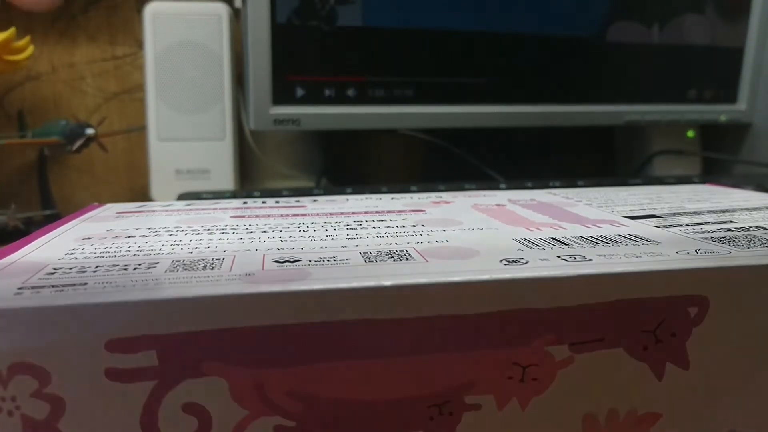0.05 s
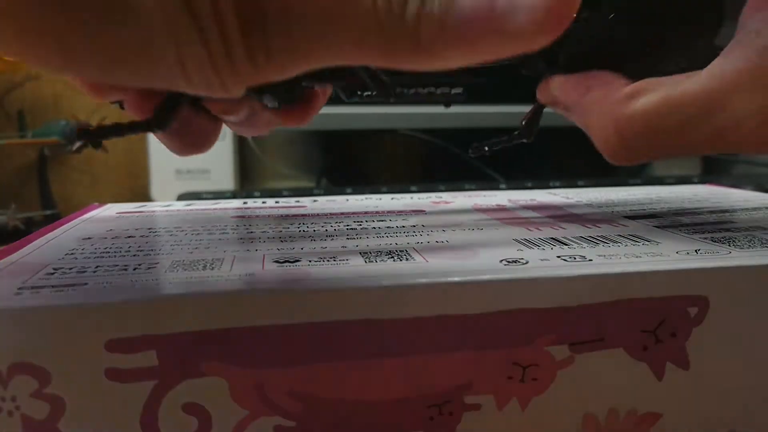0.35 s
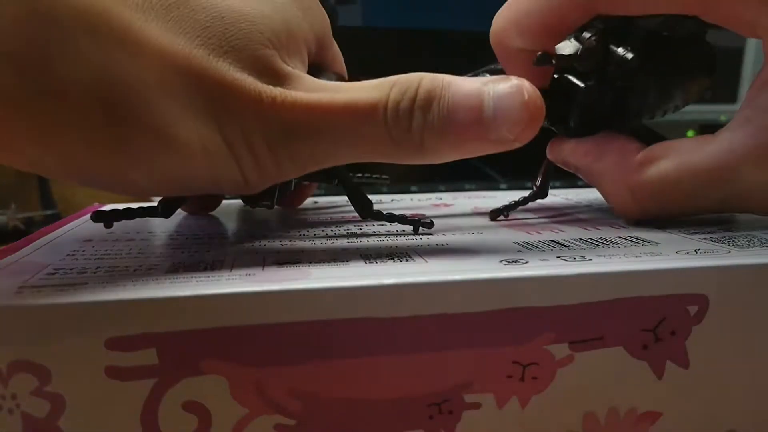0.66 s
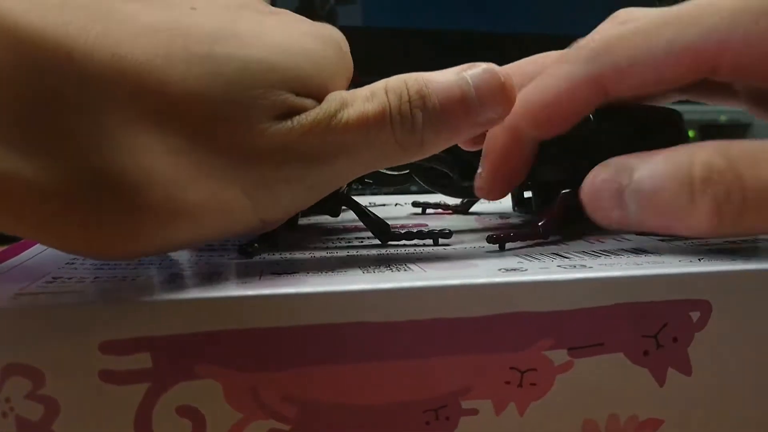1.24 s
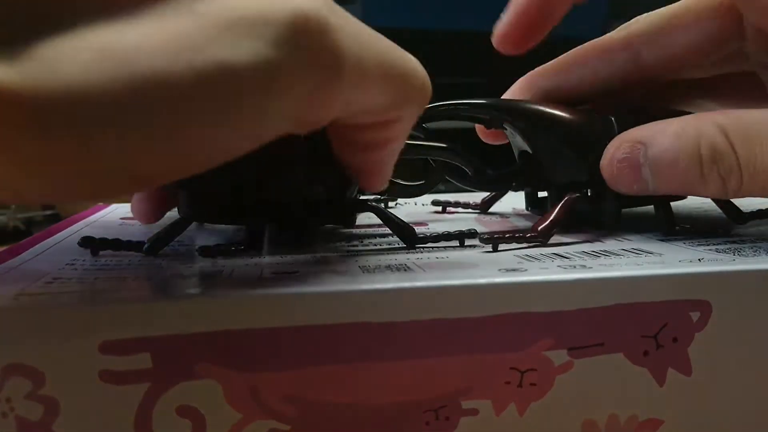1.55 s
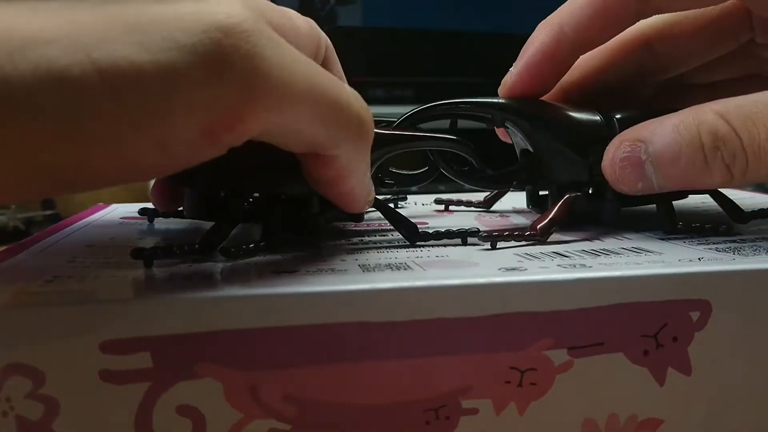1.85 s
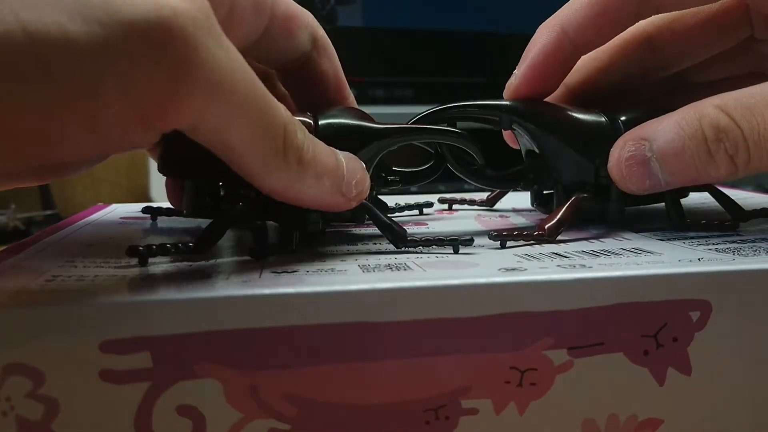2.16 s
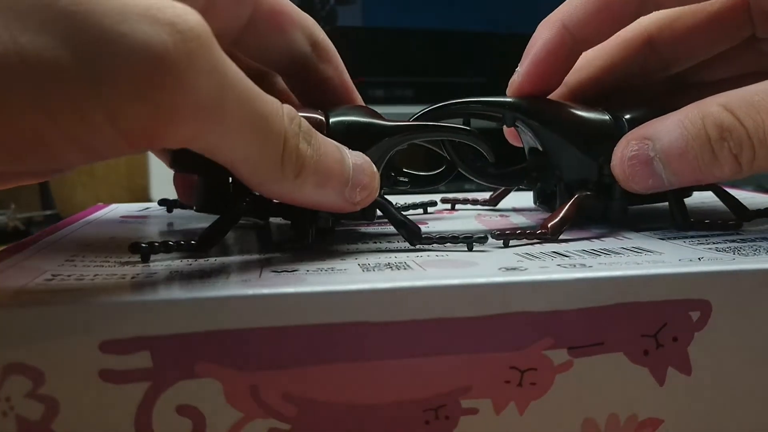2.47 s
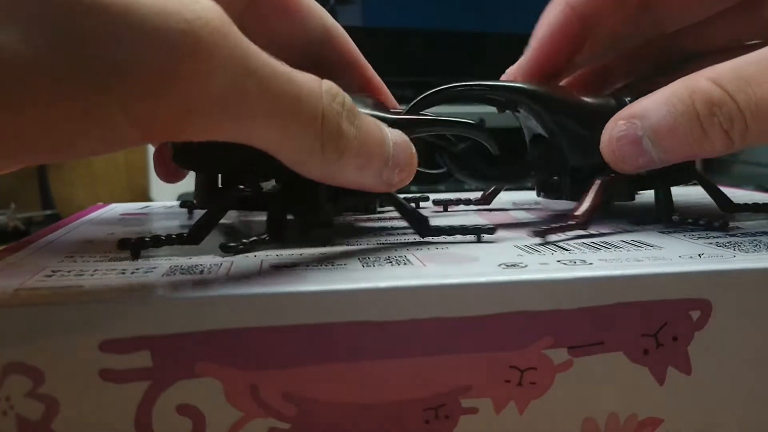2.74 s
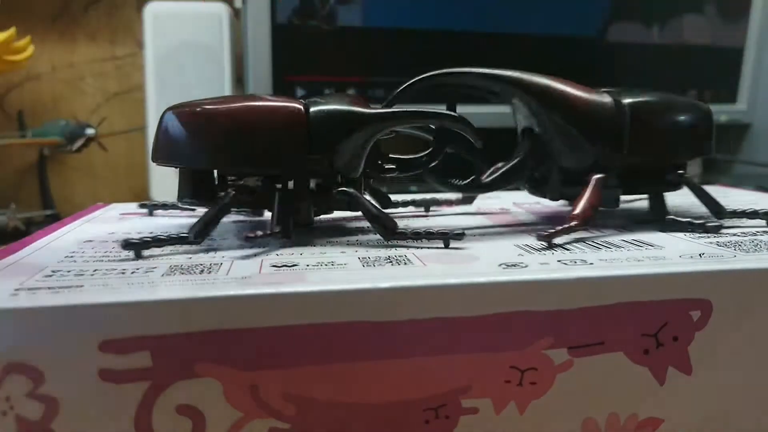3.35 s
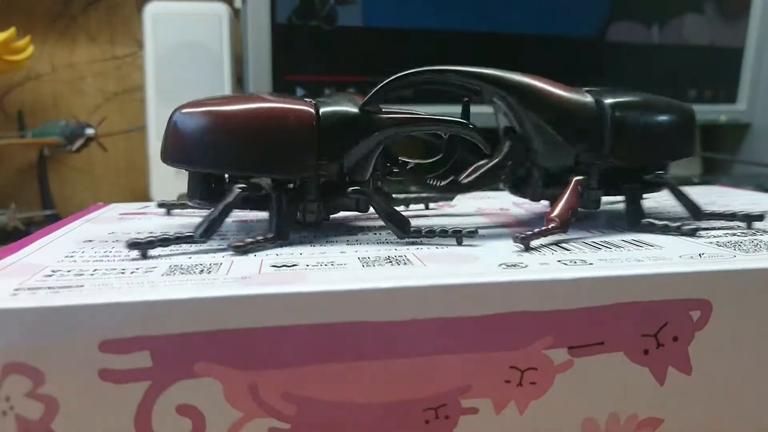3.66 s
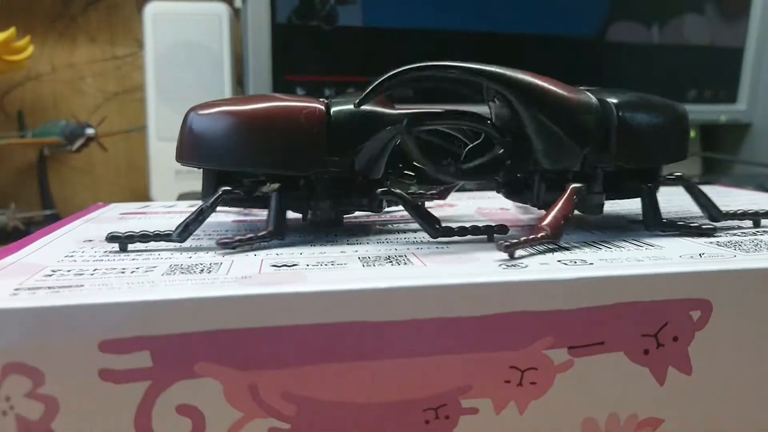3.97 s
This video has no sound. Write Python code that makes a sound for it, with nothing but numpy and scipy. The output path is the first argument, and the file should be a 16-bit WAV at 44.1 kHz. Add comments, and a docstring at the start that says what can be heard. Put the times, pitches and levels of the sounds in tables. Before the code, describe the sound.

Two plastic wind-up toy beetles rasp and whirr, close by in a small room. For the first 1.3 seconds their legs tick and scrape on a cardboard box. Four short rasping winding strokes with sharp clicks follow until about 2.5 seconds. From 2.6 seconds the motors run in a louder, rattling whirr with faint rising whines until 4 seconds. A low thump hits the left microphone at 2.7 seconds.

```python
"""In a small room, two plastic toy beetles with spring motors are set down on a cardboard box, close
to the microphones. Their legs tick and scrape. Rolling them winds the springs in short rasping
strokes: gear teeth click into the hard shells and hum in the box. Then both motors run loose together,
horns locked, with faint rising whines, and one thump hits the left microphone."""
import sys
import numpy as np
from scipy import signal
from scipy.fft import rfft, irfft
from scipy.io import wavfile

SR = 44100
rng = np.random.default_rng(int(sys.argv[2]) if len(sys.argv) > 2 else 0)


def store_pcm(level_fs):
    """Save levels as 16-bit WAV."""
    pcm = np.round(np.clip(level_fs, -1, 1) * 32767).astype(np.int16)
    wavfile.write(sys.argv[1], SR, np.atleast_2d(pcm).T)


N = 176400
T = np.arange(N) / SR


def undb(db):
    """Turn decibels into a number to multiply by."""
    return 10 ** (np.asarray(db) / 20)


def unit(x):
    """Scale a signal to an average strength (rms) of 1."""
    return x / np.sqrt(np.mean(x ** 2) + 1e-20)


def curve(rows, column=1):
    """One column of a table, joined by straight lines in time."""
    rows = np.array(rows)
    return np.interp(T, rows[:, 0], rows[:, column])


def walk(steps_per_s):
    """Random wandering around zero, with a spread near 1."""
    return 1.2 * np.interp(T * steps_per_s, np.arange(4096), rng.standard_normal(4096))


def pan(db):
    """Left and right gains; a positive number makes the left louder."""
    return undb(np.array([[db], [-db]]) / 2)


def convolve(x, response):
    """Let every sample of x set off the response, as a tap sets off a ring."""
    return signal.fftconvolve(np.atleast_2d(x), np.atleast_2d(response), axes=1)[:, :N]


def body(colour, rings=(), size=4096):
    """How an object sounds after one tap: a broad tone colour plus narrow ringing peaks."""
    hz, db = np.array(colour, float).T
    freqs = np.maximum(np.arange(size // 2 + 1) * SR / size, 1)
    colour_db = np.interp(np.log(freqs), np.log(hz), db)
    lift_db = sum(height / (1 + (2 * (freqs - centre) / width) ** 2) for centre, width, height in rings)
    cepstrum = irfft(np.log(undb(colour_db + lift_db)))
    # Folding the second half onto the first puts all the ringing after the tap.
    cepstrum[1:size // 2] *= 2
    cepstrum[size // 2 + 1:] = 0
    response = irfft(np.exp(rfft(cepstrum)))
    return response / np.linalg.norm(response)


def space(chatter_db, room_db, size=12000):
    """Paths to both microphones: direct, quick bounces off shell and box (chatter), and room echo."""
    t = T[:size]
    paths = np.zeros((2, size))
    paths[:, 0] = 1
    for db, fade_s, start_s in ((chatter_db, .011, .0004), (room_db, .11, .004)):
        shared, apart = rng.standard_normal((2, size))
        apart = signal.lfilter(*signal.butter(1, 3000, "high", fs=SR), apart)  # the lows stay shared
        fade = np.exp(-np.log(1000) * t / fade_s) * (t > start_s)
        echoes = np.array([shared + apart, shared - apart]) * fade
        paths += undb(db) * unit(echoes) / np.sqrt(size)
    paths[1] = np.roll(paths[1], int(.00017 * SR))  # the right side hears it slightly later
    return unit(paths) / np.sqrt(size)


def hits(rows, response, chatter_db, room_db):
    """Single blows on one object, each with its own echoes."""
    track = np.zeros((2, 2 * N))
    for time, db, pan_db in rows:
        blow = convolve(space(chatter_db, room_db), response)
        peak = np.abs(blow).max(axis=1).mean()
        start = int(time * SR)
        track[:, start:start + blow.shape[1]] += blow / peak * undb(db) * pan(pan_db)
    return track[:, :N]


def friction(levels, colour, rough_db, apart):
    """Uneven catching and slipping, partly different at the two microphones."""
    noise = rng.standard_normal(N) + apart * rng.standard_normal((2, N))
    grains = noise * undb(rough_db * walk(220))
    return unit(convolve(grains, body(colour))) * undb(curve(levels))


def background():
    """A very faint, steady low drone and hiss."""
    # tone colour of the noise (frequency [Hz], level [dB])
    colour = [(120, -27.5), (200, 3), (259, -17), (347, -8.5), (491, -22), (529, -16), (683, -30.5),
              (1060, -23.5), (13300, -27), (16000, -58)]
    return undb(-68) * unit(convolve(rng.standard_normal((2, N)), body(colour)))


def handling():
    """Feet drag over the card and the box rubs hollowly under the hands, above a low rumble."""
    # how loud each noise is (time [s], level [dB])
    drag = [(0, -70), (.75, -74.5), (.92, -66.5), (1.0, -54.5), (1.05, -62.5), (1.08, -42.5), (1.11, -72),
            (1.16, -59), (1.195, -51), (1.222, -29), (1.25, -65), (1.29, -57), (1.55, -47.5), (1.65, -60),
            (1.87, -69), (1.94, -64.5), (2.19, -51), (2.26, -81), (2.35, -52), (2.42, -80), (2.5, -67),
            (2.6, -76)]
    rub = [(0, -75), (.6, -74), (.9, -66), (1.05, -61), (1.3, -53.5), (1.5, -48), (1.62, -51),
           (1.76, -46.5), (1.87, -61.5), (2.1, -50.5), (2.22, -62.5), (2.33, -61), (2.45, -61.5),
           (2.6, -61), (4, -62.5)]
    rumble = [(0, -67.5), (.3, -62), (.62, -66), (.67, -47), (.76, -57.5), (.85, -59.5), (1.0, -55.5),
              (1.3, -53), (1.4, -64), (1.55, -59), (2.5, -63.5), (2.8, -59), (3.7, -59.5), (3.83, -47),
              (3.95, -60)]
    # tone colour of each noise (frequency [Hz], level [dB])
    drag_colour = [(530, -36), (900, -14), (1320, -2.5), (1460, -35), (1950, -7.5), (2730, -14.5),
                   (4360, -3.5), (5480, 3.5), (16000, -24.5)]
    rub_colour = [(60, -9.5), (160, -8), (340, -1), (450, -2.5), (650, -4), (1000, -14.5), (2000, -26.5),
                  (4000, -12), (16000, -67)]
    rumble_colour = [(20, -48), (45, -4), (68, -3), (100, -2.5), (170, -9), (300, -22), (800, -40),
                     (16000, -64)]
    return (friction(drag, drag_colour, rough_db=3.5, apart=.8)
            + friction(rub, rub_colour, rough_db=4.5, apart=.6)
            + friction(rumble, rumble_colour, rough_db=1, apart=.54))


def taps():
    """Loose legs and horns tick, shell clacks on shell, a hard leg snaps and feet knock on the box."""
    # the blows (time [s], relative peak [dB], left minus right [dB])
    ticks = [(.0865, -38.5, -4), (.128, -20.5, 3), (.145, -28.5, 1), (.154, -40, -9), (.187, -32, -2),
             (.193, -40, -4), (.201, -29.5, 2), (.207, -38, -7), (.4005, -39, -8), (.404, -30, -2),
             (.411, -29, 3), (.440, -45, -5), (.574, -32, -3), (.582, -32.5, -2), (.609, -38.5, 2),
             (.615, -37, -5), (.638, -39, -3), (.986, -37.5, -1), (1.074, -33, 0), (1.171, -32, 2),
             (1.225, -23.5, -7), (1.233, -28, 9), (1.274, -46, -1)]
    clacks = [(.1263, -17, 6)]
    snaps = [(.528, -41.5, 1), (.799, -52.5, 0), (1.8905, -22, -1)]
    knocks = [(.658, -55, 3), (1.074, -39.5, -2), (1.214, -26.5, -2), (1.219, -40, -9), (1.526, -29, -3),
              (1.722, -35, -4), (3.539, -39, 13)]
    # tone colour of each struck part (frequency [Hz], level [dB])
    tick_colour = [(500, -46), (1000, -41), (1700, -35), (2400, -20.5), (3200, -15.5), (3950, -4),
                   (4700, -7.5), (5400, -1.5), (6400, 2), (7200, -0.5), (8300, -18), (9800, -14),
                   (11500, -24.5), (16000, -22)]
    clack_colour = [(500, -33), (2400, -28), (3900, -3.5), (4800, -17), (6400, 9.5), (8300, -4),
                    (9800, 2.5), (11500, -16), (16000, -18)]
    leg_colour = [(500, -38), (2900, -20), (3600, -13), (4150, 0), (4500, -2), (4950, -1), (5600, -11),
                  (7400, -13), (9000, -24), (16000, -36)]
    box_colour = [(100, -13), (300, -2.5), (420, -7), (620, 6.5), (900, -7.5), (1400, -8.5), (1900, -3.5),
                  (2600, -15), (4000, -20.5), (8000, -13), (16000, -32)]
    return (undb(3.5) * hits(ticks, body(tick_colour), chatter_db=11.5, room_db=6)
            + hits(clacks, body(clack_colour), chatter_db=10, room_db=-2)
            + undb(5.5) * hits(snaps, body(leg_colour), chatter_db=1.5, room_db=-13)
            + undb(7.5) * hits(knocks, body(box_colour), chatter_db=5.5, room_db=-.5))


def gears(rows, speed, jitter, wobble, uneven_db, grit_db, grit_fade_teeth, chatter_db,
          shift_db=0, contacts=4):
    """One click for each gear tooth, at one of a few contact points, with grinding between clicks."""
    teeth_per_s = curve(rows) * speed * (1 + wobble * walk(25))
    turning = (T >= rows[0][0]) & (T <= rows[-1][0])
    teeth_passed = np.cumsum(turning * teeth_per_s * (1 + jitter * walk(400))) / SR
    gain = turning * undb(curve(rows, column=2) + .7 * walk(30))
    click_at = np.flatnonzero(np.diff(np.ceil(teeth_passed), prepend=0))
    strength = unit(undb(uneven_db * rng.standard_normal(2048)[:len(click_at)]))
    strength *= np.sqrt(SR / teeth_per_s[click_at]) * gain[click_at]  # speed alone adds no loudness
    contact = rng.integers(0, contacts, 2048)[:len(click_at)]
    clatter = 0
    for point in range(contacts):
        load = undb(shift_db * walk(12))  # the load can shift between contacts
        clicks = np.zeros(N)
        clicks[click_at] = strength * (contact == point) * load[click_at]
        clatter = clatter + convolve(clicks, space(chatter_db, room_db=-14))
    grit_fade = np.exp(-(teeth_passed % 1) / grit_fade_teeth) * np.sqrt(2 / grit_fade_teeth)
    grind = grit_fade * gain * rng.standard_normal((2, N))
    return (clatter + undb(grit_db) * grind) / np.sqrt(1 + undb(grit_db) ** 2)


def winding():
    """Each push speeds the gears up and lets them slow again; their clicks ring in the shell."""
    # four pushes, each a list of (time [s], tooth rate [1/s], relative level [dB])
    strokes = [
        [(1.304, 117, -51), (1.33, 197, -30.5), (1.40, 254, -24.5), (1.45, 296, -24), (1.505, 363, -21.5),
         (1.53, 240, -25.5), (1.555, 120, -41)],
        [(1.676, 170, -37), (1.70, 316, -24.5), (1.722, 327, -20), (1.75, 165, -33), (1.77, 118, -35.5),
         (1.802, 165, -30), (1.815, 150, -44)],
        [(1.974, 100, -34.5), (2.015, 160, -34), (2.05, 270, -24), (2.08, 335, -25.5), (2.118, 354, -18.5),
         (2.15, 295, -26.5), (2.175, 73, -52)],
        [(2.277, 103, -42), (2.32, 152, -40.5), (2.36, 79, -44.5)],
    ]
    # single teeth slipping in a held toy (time [s], relative peak [dB], left minus right [dB])
    slips = [(1.256, -23.5, -1), (1.305, -11.5, -1), (1.575, -25.5, 0), (1.777, -23, -3), (1.826, -27, 8),
             (2.043, -9.5, 2), (2.215, -24.5, 4), (2.229, -23.5, 2), (2.312, -9.5, 1.5), (2.392, -30.5, 3),
             (2.437, -18, 1), (2.4445, -29, 5), (2.454, -22, 4), (2.470, -32, 3), (2.493, -21.5, -4),
             (2.500, -22.5, 12), (2.511, -33, 11), (2.5365, -20, 1), (2.5635, -26, 5)]
    # tone colour of the shell (frequency [Hz], level [dB])
    shell_colour = [(120, -42), (200, -60), (347, -17.5), (409, -40), (709, -22), (806, -29), (1080, -25),
                    (1500, -34), (1980, -29.5), (2330, -28), (4430, -6), (5330, -9), (6280, 3), (8120, -16),
                    (9750, -12.5), (12200, -25), (16000, -18.5)]
    teeth = 0
    for stroke, pan_db in zip(strokes, [1.5, 2.5, 3.5, 2.5]):
        teeth += pan(pan_db) * gears(stroke, speed=1, jitter=.06, wobble=.0077, uneven_db=2.5,
                                     grit_db=-8, grit_fade_teeth=1, chatter_db=2.5, contacts=6)
    shell = body(shell_colour)
    return (undb(3.5) * convolve(teeth, shell)
            + undb(.5) * hits(slips, shell, chatter_db=-4.5, room_db=-6)
            + undb(-36) * sum(box_hum(stroke) for stroke in strokes))


def box_hum(rows):
    """The box hums roughly at the rate of the gear teeth, and at two and three times that rate."""
    # tones in the hum (multiple of the tooth rate, relative level [dB])
    harmonics = [(1, -14), (2, -9.5), (3, -12)]
    unsteady = 1 + .03 * walk(30) + .05 * walk(300)
    phase = 2 * np.pi * np.cumsum(curve(rows) * unsteady) / SR
    tone = sum(undb(db + 1.8 * walk(10)) * np.sin(round(k) * phase) for k, db in harmonics)
    turning = (T > rows[0][0]) & (T <= rows[-1][0])
    return tone * undb(curve(rows, column=2)) * turning


def running():
    """Both motors whirr near the middle; the second, slightly faster one takes over for a while."""
    # the free run (time [s], base tooth rate [1/s], relative level [dB])
    run = [(2.577, 104, -35), (2.605, 199, -30.5), (2.63, 322, -20), (2.68, 373, -15), (2.80, 383, -16),
           (2.85, 372, -15.5), (2.93, 400, -16), (2.975, 343, -19.5), (3.01, 370, -16.5), (3.20, 363, -16),
           (3.31, 390, -18), (3.45, 350, -17.5), (3.54, 395, -16.5), (3.70, 368, -17.5), (3.76, 392, -15.5),
           (3.82, 333, -17.5), (3.90, 365, -17.5), (4.0, 390, -17)]
    # how much louder the first motor is than the second (time [s], lead [dB])
    first_lead = [(2.58, 18), (2.95, 15.5), (3.2, 0.5), (3.4, -7), (3.6, -7), (4.0, -0.5)]
    # tone colour of both shells (frequency [Hz], level [dB])
    shell_colour = [(100, -35.5), (250, -31), (400, -29), (750, -24), (1100, -26), (1500, -30.5),
                    (1950, -25), (2350, -26.5), (2900, -20.5), (3400, -13), (4200, -7.5), (4700, -8.5),
                    (5400, -9), (5800, -4.5), (6400, -2), (7100, -10), (8200, -16.5), (10000, -12.5),
                    (11000, -14.5), (13000, -19), (15700, -14.5)]
    # where each beetle's shell rings (frequency [Hz], width [Hz], lift [dB])
    first_rings = [(3880, 27, 1), (4514, 32, -4), (4610, 44, 10), (5540, 180, 7.5), (5930, 160, 7),
                   (6290, 100, 1.5), (6620, 130, 9.5), (6660, 31, 2.5), (7166, 260, 12), (7640, 106, 12.5),
                   (9920, 250, 4), (15000, 220, 2)]
    second_rings = [(4256, 90, 5.9), (4380, 81, 8.5), (4690, 32, 3.2), (5380, 26, 3), (5830, 46, 4.5),
                    (6400, 36, 3.5), (6330, 24, 4.7), (7400, 21, 1.7), (8480, 130, 5), (10600, 80, 2.5),
                    (12080, 210, 8), (13400, 120, 5)]
    first_teeth = gears(run, speed=.97, jitter=.06, wobble=.015, uneven_db=1,
                        grit_db=-3, grit_fade_teeth=.86, chatter_db=3, shift_db=1.5)
    second_teeth = gears(run, speed=1.04, jitter=.08, wobble=.025, uneven_db=2.5,
                         grit_db=-1, grit_fade_teeth=.62, chatter_db=3, shift_db=2)
    first = convolve(first_teeth, body(shell_colour, first_rings)) * pan(.8)
    second = convolve(second_teeth, body(shell_colour, second_rings)) * pan(.42)
    lead = undb(curve(first_lead))
    rasp = (lead * first + second) / np.sqrt(1 + lead ** 2)
    return undb(2.5) * rasp + undb(-32) * box_hum(run)


def thump(start_s=2.689, gain_db=-6.5, start_hz=210, rest_hz=52, sag_s=.0031, decay_s=.012):
    """A bump at the left microphone: a sharp edge, then a low swing that drops in pitch and dies."""
    t = np.maximum(T - start_s, 0)
    pitch = rest_hz + (start_hz - rest_hz) * np.exp(-t / sag_s)
    phase = 2 * np.pi * np.cumsum((t > 0) * pitch) / SR
    envelope = np.exp(-t / decay_s) * (1 - np.exp(-t / .000053))
    return undb(gain_db) * np.cos(phase) * envelope * np.array([[1], [0]])


def whines(rise_per_s=.9):
    """As a wheel gathers speed, a faint whine swells, climbs and fades, roughened by rattling gears."""
    # the whines (start [s], length [s], starting pitch [Hz], level [dB])
    glides = [(2.719, 0.11, 695, -49), (2.949, 0.31, 943, -57), (3.162, 0.2, 710, -43.5),
              (3.271, 0.2, 1080, -46), (3.549, 0.15, 700, -44.5), (3.647, 0.27, 896.5, -45),
              (3.81, 0.11, 658, -42), (3.883, .16, 1077, -45.5)]
    track = 0
    for start, length, hz, db in glides:
        t = np.clip(T - start, 0, length)
        rattle = .03 * walk(260)
        pitch = hz * (1 + rise_per_s * t + rattle)
        swell = undb(db + 2 * walk(90)) * np.sin(np.pi * t / length)
        track += swell * np.sin(2 * np.pi * np.cumsum(pitch) / SR)
    return track


def scene():
    """Add all the sounds together, in stereo."""
    return handling() + background() + winding() + running() + whines() + taps() + thump()


def record(dry):
    """The recorder drops the deepest bass, rounds the very highest peaks and cuts the top treble."""
    thin = signal.sosfilt(signal.butter(2, 32, "high", fs=SR, output="sos"), dry)
    rounded = thin / (1 + (thin / .8) ** 6) ** (1 / 6)
    return signal.sosfilt(signal.ellip(10, .2, 80, 15750, fs=SR, output="sos"), rounded)


dry = scene()
out = record(dry)
store_pcm(out)
```